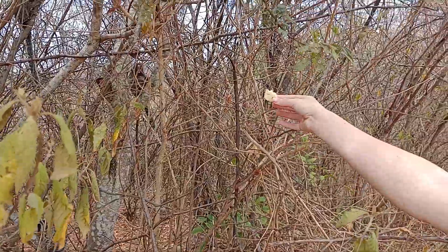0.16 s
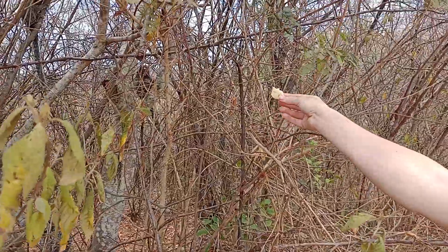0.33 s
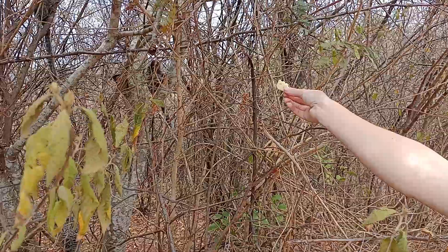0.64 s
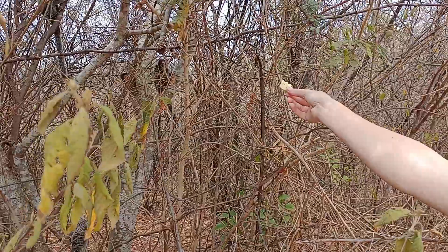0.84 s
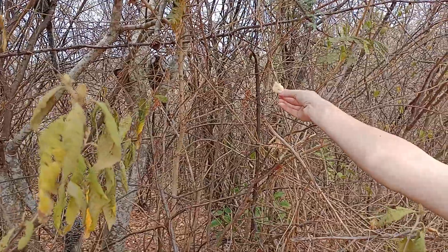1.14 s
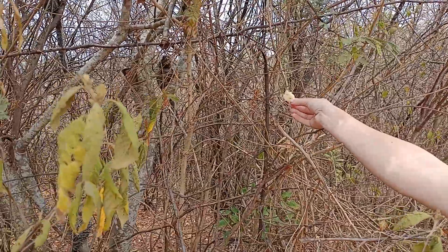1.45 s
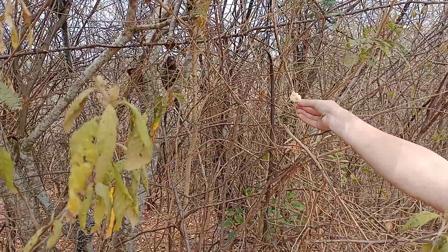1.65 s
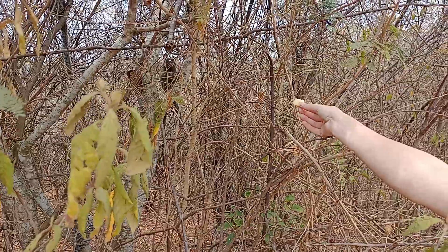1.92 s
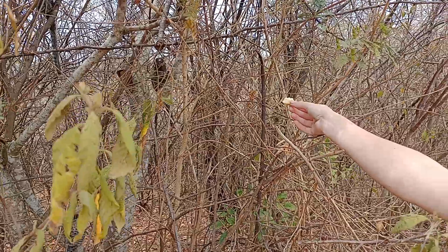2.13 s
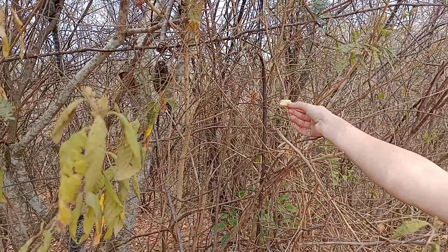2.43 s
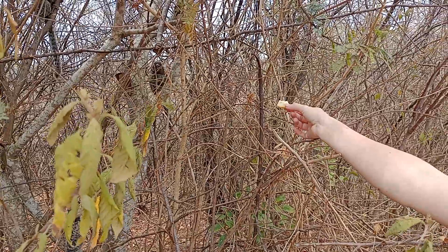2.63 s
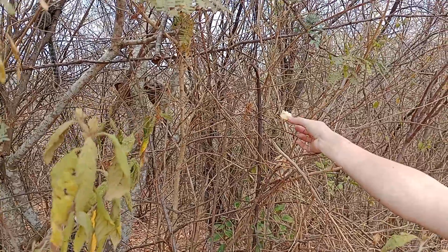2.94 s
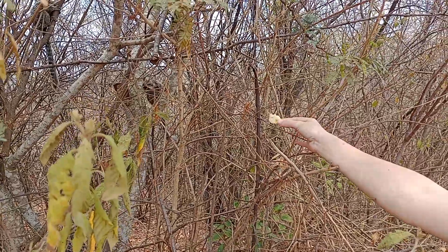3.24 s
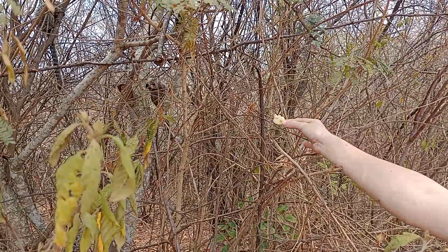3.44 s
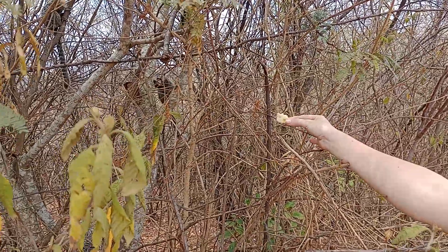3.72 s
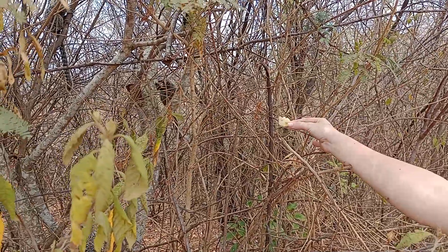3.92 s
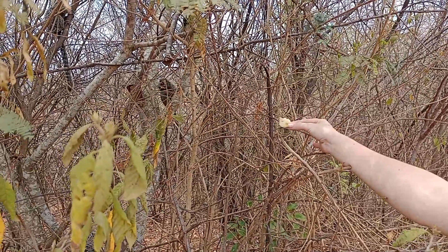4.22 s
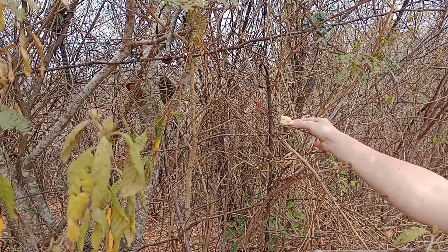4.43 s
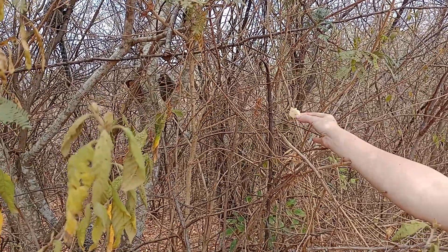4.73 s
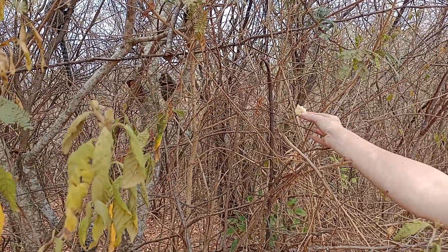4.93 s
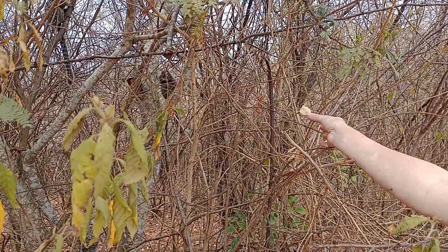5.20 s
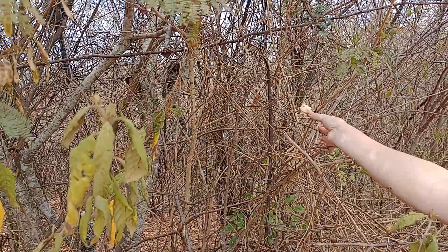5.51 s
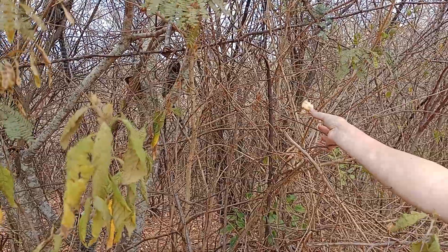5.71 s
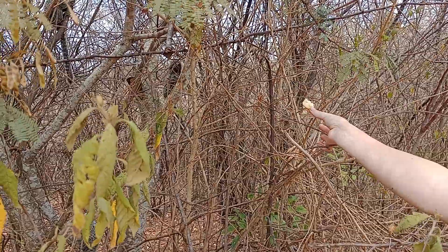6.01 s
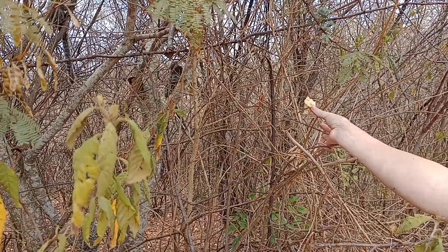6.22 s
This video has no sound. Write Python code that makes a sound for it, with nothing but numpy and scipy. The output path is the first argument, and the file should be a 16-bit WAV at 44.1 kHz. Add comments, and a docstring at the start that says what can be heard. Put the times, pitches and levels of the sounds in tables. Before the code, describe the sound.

A quiet thicket heard by a handheld microphone, with steady soft air hiss. Brittle twig crackles and high, very brief downward chirps are scattered through the first half, with a faint rustle of dry leaves around two seconds. After a sparse lull, hard, crisp clicks close to the microphone repeat every few tenths of a second until the end, mixed with tiny squeaks, chirps and a soft low gust.

```python
"""Two short squeaks and a twig snap open the scene, then falling chirps: small monkeys scold in a dry thicket.
The calls are gliding tones, stacks of partials and a thin whistle; sharp dry clicks close by are impulses
through resonant bands, and twigs and leaves a few steps off are decaying bursts of band-passed noise.
Sparse echoes join them over shaped noise for the hiss of open air, a far rustle of leaves and a low wind
that gusts near the end, with faint chance ticks and steady insect tones that soon fade away."""
import sys
import numpy as np
from scipy import signal
from scipy.io import wavfile
from scipy.ndimage import uniform_filter1d

SR = 44100
rng = np.random.default_rng(int(sys.argv[2]) if len(sys.argv) > 2 else 0)


def wav_record(signal):
    """Record a signal, one row per channel, as 16-bit PCM in the file named by sys.argv[1]."""
    frames = np.transpose(np.atleast_2d(signal))
    bounded = np.clip(frames, -1, 1)
    # unit amplitude maps onto the largest positive 16-bit level
    quanta = np.round(bounded * 32767).astype(np.int16)
    wavfile.write(sys.argv[1], SR, quanta)


N = 280476  # length [samples]


def gain_of(db):
    """Decibel law: 20 dB is a tenfold amplitude."""
    return 10 ** (np.asarray(db) / 20)


def evened(x):
    """Normalization to unit root mean square."""
    return x / np.sqrt(np.mean(x ** 2) + 1e-20)


def read(points, hz):
    """Interpolation of a (frequency, value) curve along logarithmic frequency."""
    f, value = np.transpose(points)
    return np.interp(np.log(hz + 1), np.log(f + 1), value)


def level_curve(points):
    """Amplitude envelope interpolated in decibels through (time [s], level [dB]) points."""
    return gain_of(np.interp(np.arange(N) / SR, *np.transpose(points)))


def band(x, lo_hz, hi_hz):
    """Causal Butterworth band-pass, which rings after its input as a resonator does."""
    edges = np.clip([lo_hz, hi_hz], 20, .48 * SR)
    return signal.sosfilt(signal.butter(2, edges, "bandpass", fs=SR, output="sos"), x)


def tone(hz):
    """Sinusoid of unit RMS whose phase is the running sum of its frequency."""
    return np.sqrt(2) * np.sin(2 * np.pi * np.cumsum(hz) / SR)


def noise(spectrum, size, patchy_db, count=12):
    """Random short-time spectra under a fixed envelope, with drifting patches about count bins wide."""
    hz = np.fft.rfftfreq(size, 1 / SR)
    real, imaginary, patches = rng.standard_normal((4 * N // size + 5, len(hz), 3)).T
    patches = uniform_filter1d(patches, size=count, axis=0)  # across frequency
    patches = evened(uniform_filter1d(patches, size=14, axis=1))  # across time
    level_db = read(spectrum, hz)[:, None] + patchy_db * patches
    z = (real + 1j * imaginary) * gain_of(level_db)
    return evened(signal.istft(z, nperseg=size, noverlap=3 * size // 4)[1][:N])


def add(mix, s, sound):
    """Superposition of one sound on the mix from time s [s]."""
    part = mix[round(s * SR):][:len(sound)]
    part += sound[:len(part)]


def played(rows, source):
    """Superposition of one sound for each row, placed at the time in its first column."""
    mix = np.zeros(N)
    for s, *how in rows:
        add(mix, s, source(*how))
    return mix


def chirp(length, top_hz, end_hz, top_db, fade_db, octave_db):
    """Source and filter: a shaky tone and its octave dive along a parabola through the throat's response."""
    # throat response: (frequency [Hz], gain [dB])
    throat_curve = [(2000, -4.5), (4000, -13.5), (5500, -8.5), (8000, -11.5), (9200, -13), (11500, -8.5),
                    (12500, -0.5), (14000, 8.5), (16000, -31)]
    notch_hz, notch_depth_db = 10300, -14  # a narrow notch, where the gliding chirp dips in level
    dive_bow = 1.023  # midway pitch over that of an even glide
    u = np.linspace(0, 1, round(length * SR))
    middle_hz = dive_bow * np.sqrt(top_hz * end_hz)
    hz = np.polyval(np.polyfit([0, .5, 1], [top_hz, middle_hz, end_hz], deg=2), u)
    hz = hz * (1 + .02 * evened(band(rng.standard_normal(len(u)), 300, 1500)))
    voice = 0
    for pitch, db in ((hz, 0), (2 * hz, octave_db)):
        notch_db = notch_depth_db * np.exp(-((pitch - notch_hz) / 800) ** 2)
        in_range = pitch < .45 * SR  # the octave shows once it falls below this limit
        voice = voice + tone(pitch) * gain_of(db + read(throat_curve, pitch) + notch_db) * in_range
    flutter_db = 3.0 * np.tanh(evened(band(rng.standard_normal(len(u)), 200, 600)))
    attack = np.sin(np.pi / 2 * np.minimum(u * length / .003, 1)) ** 2  # rises over 3 ms
    release = np.minimum((1 - u) / .1, 1)  # the last tenth
    return voice * gain_of(top_db + fade_db * u + flutter_db) * attack * release


def squeak(length, start_hz, end_hz, db, second_db, third_db, hoarse):
    """Harmonic series of seven partials; hoarseness modulates the pitch and roughens the upper partials."""
    hz = np.linspace(start_hz, end_hz, round(length * SR))
    wobble, rasp = rng.standard_normal((len(hz), 2)).T
    hz = hz * (1 + .03 * hoarse * evened(uniform_filter1d(wobble, size=60)))
    rasp = hoarse * evened(band(rasp, 80, 380))
    upper_db = third_db - 5 - 26 * hoarse  # fourth to seventh partials, weaker when hoarse
    levels = [0, second_db, third_db] + [upper_db] * 4
    stack = sum(gain_of(level) * (1 + k * rasp) * tone((k + 1) * hz) for k, level in enumerate(levels))
    return gain_of(db) * stack * signal.windows.tukey(len(hz), .4)


def whistle(rows):
    """Frequency and amplitude modulation of one thin tone that flutters in level."""
    s, hz, db = np.transpose(rows)
    t = np.arange(s[0], s[-1], 1 / SR)
    flutter = 1 + 0.19 * evened(band(rng.standard_normal(len(t)), 100, 500))
    voice = tone(np.interp(t, s, hz)) * gain_of(np.interp(t, s, db))
    return voice * flutter * signal.windows.tukey(len(t), .08)


def monkeys():
    """Superposition of the three kinds of call."""
    # falling chirps: (time [s], length [s], top pitch [Hz], end pitch [Hz], level at the top before
    # the throat [dB], change of level to the end [dB], octave over the fundamental [dB])
    chirp_rows = [ (.2445, 0.02, 13080, 2143, -24, -19, -10), (.6465, 0.016, 9860, 2270, -30, -19.5, -18),
                  (1.0605, 0.018, 14400, 2470, -29.5, -21, -5),
                  (1.3845, 0.0091, 13740, 5880, -23, -12.5, -18),
                  (1.653, 0.017, 15700, 4038, -42, 2, -26.5),
                  (2.368, 0.011, 14440, 4500, -21.5, -20, -21.5),
                  (2.392, 0.014, 11600, 2546, -26, -31.5, -15), (2.7205, 0.014, 15300, 3960, -27, -8, -25),
                  (4.0975, .018, 14070, 2625, -32.5, -13, -16), (4.954, 0.02, 15070, 2550, -34.5, -14, -23),
                  (4.981, 0.0079, 14000, 6900, -33.5, -11, -25.5),
                  (5.4835, 0.021, 12800, 2193, -31.5, -14, -6.5)]
    # squeaks: (time [s], length [s], start pitch [Hz], end pitch [Hz], level of the first partial [dB],
    # second partial over the first [dB], third over the first [dB], hoarseness [0-1])
    squeak_rows = [ (.010, 0.03, 1027, 1030, -63.5, -18, -11, 0.2),
                   (.129, 0.016, 1067, 1024, -63, -12, -6, 0.1), (1.270, 0.025, 897, 843, -78, 3, 13, 0.64),
                   (1.377, 0.0165, 857, 858.9, -80, 0, 13.5, 0.57),
                   (3.584, 0.02094, 959, 898, -80.5, 13.5, 18, 0.4),
                   (3.678, 0.024, 913, 838, -82.5, 12, 18, 0.5),
                   (5.128, 0.027, 1015, 934.5, -62.5, -3, -9, 0),
                   (5.188, 0.0158, 1017, 974.4, -67, -4, 5.5, 0.01),
                   (5.512, 0.0342, 1620, 1640, -66.5, -14, -2, 0.32),
                   (5.772, 0.02119, 1084, 1036, -66, -2, -1, 0)]
    # one list for each whistle: (time [s], pitch [Hz], level [dB])
    whistle_rows = [
        [(2.702, 12400, -73), (2.705, 13900, -55), (2.711, 15200, -30), (2.717, 15500, -40.5),
         (2.7205, 15200, -41.5)],
        [(4.220, 8800, -62), (4.235, 9220, -79.5), (4.248, 8711, -64), (4.262, 8798, -78)],
    ]
    whistles = played([(rows[0][0], rows) for rows in whistle_rows], whistle)
    return played(chirp_rows, chirp) + played(squeak_rows, squeak) + whistles


def click(spike_db, knock_db, thud_db, ring_hz, crackle_db, knock_hz):
    """Impulse response of one sharp break: bright ringing spike, hollow knock with an upper mode, low thud."""
    t = np.arange(round(.02 * SR)) / SR
    crackle = gain_of(crackle_db - 60 * t / 0.0097) * rng.standard_normal(len(t))  # T60 of 9.7 ms
    drive = (t == 0) + crackle
    spike = band(drive, 5260, 17700) + 1.7 * band(drive, ring_hz - 200, 1.05 * ring_hz + 200)
    hollow = band(drive, 0.66 * knock_hz, 2.04 * knock_hz)
    mode = 1.27 * band(drive, .97 * knock_hz, 1.03 * knock_hz)
    upper_mode = .5 * band(drive, 4650, 5150)
    knock = hollow + mode + upper_mode
    thud = band(drive, 316, 790)
    return gain_of(spike_db) * spike + gain_of(knock_db) * knock + gain_of(thud_db) * thud


def close_clicks():
    """Superposition of sharp breaks close by."""
    # breaks: (time [s], spike gain [dB], knock gain [dB], thud gain [dB], ring [Hz],
    # crackle drive at its start [dB], knock [Hz])
    click_rows = [ (.6268, -20.5, -21, -30, 13500, -30, 2322), (.6505, -18.5, -45, -43.5, 12400, -36, 2300),
                  (.6686, -22.5, -24, -40, 12500, -30, 2300), (.6957, -24.5, -28, -46, 13200, -18, 2000),
                  (.853, -37, -52, -55, 8569, -13, 2300), (.976, -37.5, -37, -55, 13580, -32, 2000),
                  (1.5587, -26, -17.5, -17, 2600, -15, 1390), (3.7467, -45, -21.5, -43, 4450, -21, 2480),
                  (4.0069, -32, -19, -17, 3600, -20, 1620), (4.5894, -21, -7, -8.5, 13790, -20.5, 1560),
                  (4.5924, -18.5, -17.5, -21, 9500, -20, 1680), (4.5979, -23, -6, -11, 13100, -12.5, 1808),
                  (4.6016, -18.5, -17.5, -16, 4670, -15, 1860),
                  (4.7646, -3.5, -19.5, -44.5, 4880, -19.5, 2230),
                  (4.7674, -7.5, -13, -18.5, 13900, -16.5, 1770),
                  (4.7718, -42.5, -17, -20, 10500, -5.5, 2280), (4.9334, -3.5, -17, -41, 6600, -18.5, 2180),
                  (4.9369, -2.5, -7.5, -14, 6841, -44, 2270), (4.9389, -26, -20, -43, 13380, -4, 2300),
                  (5.1805, -8, -4, -21, 9540, -20, 2050), (5.1826, -5.5, -14, -9.5, 6560, -22.5, 1900),
                  (5.3789, -12, -42, -32, 9300, -12.5, 2000), (5.3800, -6, -4, -10, 12890, -17.5, 1640),
                  (5.3842, -12.5, -16, -11, 13580, -12.5, 1450), (5.6095, -7, -14, -33, 9500, -20.5, 1540),
                  (5.6110, -10.5, -13, -25.5, 13100, -9.5, 1985),
                  (5.7925, -1.5, -16.5, -22, 5100, -14.5, 2040), (6.0747, -10, -16, -14, 5600, -14.5, 1630),
                  (6.0805, -4.5, -5.5, -15, 9840, -19, 1810)]
    return played(click_rows, click)


def snap(crackle_db, knock_db, thud_db, bright_hz):
    """Fracture noise: many tiny breaks excite bright crackle and rings, a woody knock and a low thud."""
    rise_s, t60_s = 0.0026, 0.05
    t = np.arange(round(.15 * SR)) / SR
    grit, sizes = rng.standard_normal((len(t), 2)).T
    grit = grit * gain_of(3.0 * evened(uniform_filter1d(sizes, size=30)))
    swell = np.minimum(t / rise_s, 1)
    around_bright = band(grit, 0.52 * bright_hz, 1.9 * bright_hz)
    crackle = evened(band(around_bright, 6130.0, 14350))
    crackle = crackle + 0.75 * evened(band(grit, 4800.0, 11130))
    # two rings at randomly drawn pitches join the ring at the bright pitch
    pitches = [bright_hz, *bright_hz * rng.uniform(.7, 1.15, size=2)]
    rings = 0.39 * sum(evened(band(grit, .97 * hz, 1.03 * hz)) for hz in pitches)
    # the wood takes one hard first blow
    blow = grit * (1 + 0.82 * np.exp(-((t - rise_s) / 0.00066) ** 2))
    knock = evened(band(blow, 1000, 3400) + .9 * band(blow, 2300, 3050))
    thud = evened(band(blow, 450, 1300))
    body = gain_of(knock_db) * knock + gain_of(thud_db) * thud
    # the burst holds briefly, then decays faster and faster
    fading = gain_of(-60 * (t / t60_s) ** 1.19)
    brief = gain_of(-60 * t / (0.95 * t60_s))  # knock and thud decay evenly in decibels
    return swell * (gain_of(crackle_db) * (crackle + rings) * fading + body * brief)


def twigs_and_leaves():
    """Superposition of fractures a few steps off."""
    # snaps: (time [s], crackle [dB], knock [dB], thud [dB], bright pitch [Hz]), levels before the decay
    snap_rows = [ (.1255, -35.5, -49, -65, 12660), (.2812, -39.5, -54.5, -57.5, 11100),
                 (.4565, -41.5, -49.5, -52.5, 8400), (1.2042, -45.5, -63, -51.5, 13330),
                 (1.3615, -48.5, -56, -56, 9900), (1.418, -52.5, -59, -65, 9800),
                 (1.557, -40.5, -46.5, -48, 9748), (1.7315, -47.5, -50, -52.5, 9166),
                 (2.0248, -61, -54.5, -68, 4549), (2.052, -49, -50.5, -54, 11050),
                 (2.3158, -44, -52.5, -57, 10570), (2.4965, -46, -52, -52.5, 9930),
                 (2.9542, -63.5, -58.5, -70, 4500), (3.9141, -50, -50.5, -53.5, 7125),
                 (4.646, -58.5, -55, -54, 9300), (4.9115, -47, -54, -59, 13710),
                 (5.0775, -42, -43.5, -54.5, 7900), (5.260, -42, -51, -53.5, 11500),
                 (5.4756, -48.5, -55.5, -53.5, 12500), (5.5582, -66, -56, -64, 4740),
                 (5.8185, -54.5, -63, -62, 8692), (5.9953, -43, -51.5, -51.5, 9966),
                 (6.184, -44, -50, -54.5, 8105)]
    return played(snap_rows, snap)


def thicket(x):
    """Multiple scattering: sparse echoes of random sign, each band with its own decay time."""
    # early echoes off stems: (frequency [Hz], T60 [s])
    stem_t60 = [(1000, 0.027), (4000, 0.049), (8000, 0.063), (13000, 0.054), (16000, 0.064)]
    taps = np.zeros(SR // 2)
    at = np.arange(60, len(taps) - 12, 12)
    taps[at + rng.integers(0, 12, len(at))] = rng.choice([-1., 1.], len(at))
    hz, t, z = signal.stft(taps, SR, nperseg=128)
    stems = gain_of(-60 * t / read(stem_t60, hz)[:, None])
    farther_trees = gain_of(-24.5 - 60 * t / 0.3)  # a faint slower tail
    tail = signal.istft(z * (stems + farther_trees), SR, nperseg=128)[1]
    return signal.oaconvolve(x, tail / np.linalg.norm(tail))[:N]


def air():
    """Stationary noise with a broad spectrum: the hiss of open air."""
    # spectrum: (frequency [Hz], relative density [dB per Hz])
    air_spectrum = [(30, -38), (60, -11), (110, -1), (200, -3.5), (400, -8), (700, -10), (1200, -12.5),
                    (2200, -10), (3200, -11.5), (5700, -13.5), (10000, -14), (15600, -15), (16000, -29)]
    # level: (time [s], level [dB])
    air_level = [(0.0, -64), (6.36, -63.5)]
    return noise(air_spectrum, size=1024, patchy_db=1.77) * level_curve(air_level)


def far_rustle():
    """Patchy noise with a slowly varying envelope: far dry leaves."""
    # spectrum: (frequency [Hz], relative density [dB per Hz])
    leaf_spectrum = [(300, -45), (1200, -14), (2000, -6), (2800, -6.5), (4000, -11), (8000, -23)]
    # level: (time [s], level [dB])
    leaf_level = [(0, -102), (1.6, -80), (1.9, -69), (2.4, -70.5), (2.7, -80), (3.3, -97), (3.7, -74.5),
                  (4.2, -74), (4.55, -69.5), (6.36, -78.5)]
    return noise(leaf_spectrum, size=256, patchy_db=4.5, count=3) * level_curve(leaf_level)


def low_wind():
    """Low-frequency noise under a gust envelope."""
    # spectrum: (frequency [Hz], relative density [dB per Hz])
    wind_spectrum = [(25, -29), (50, -6), (97, 3), (140, -6.5), (220, -21), (400, -44)]
    # level: (time [s], level [dB])
    gust_level = [(0, -82), (1.35, -78.5), (1.62, -72), (1.85, -80.5), (4.9, -84.5), (5.2, -75.5),
                  (5.29, -61.5), (5.33, -52), (5.42, -55.5), (5.62, -59), (5.82, -73), (6.36, -69.5)]
    return noise(wind_spectrum, size=4096, patchy_db=0.5) * level_curve(gust_level)


def ticks():
    """Shot noise: faint decaying grains at chance instants in the dry leaves."""
    mean_rate = 18  # [ticks per s]
    least_db = -61  # weakest grain, before the band-pass
    grain_db = least_db + 3.5 * np.minimum(rng.exponential(1, N), 3)
    strikes = gain_of(grain_db) * (rng.random(N) < mean_rate / SR)
    grain = rng.standard_normal(200) * gain_of(-60 * np.arange(200) / SR / 0.013)  # T60 of 13 ms
    return band(signal.oaconvolve(strikes, grain)[:N], 3800, 10700)


def insects():
    """Pure tones of steady pitch that hold their level, then fade linearly over 0.27 s."""
    # tones: (pitch [Hz], level before the fade [dB], time of silence [s])
    insect_rows = [(4770, -79, 0.531), (5080, -84, 1.1)]
    t = np.arange(N) / SR
    return sum(gain_of(db) * tone(np.full(N, hz)) * np.clip((end - t) / 0.27, 0, 1)
               for hz, db, end in insect_rows)


def scene():
    """Direct-to-reverberant ratio as a cue of distance: calls and snaps carry more echo than close clicks."""
    calls, near, twigs = monkeys(), close_clicks(), twigs_and_leaves()
    echoes = thicket(gain_of(-2.5) * calls + gain_of(-4.5) * twigs + gain_of(-23) * near)
    background = air() + far_rustle() + low_wind() + ticks() + insects()
    return (calls + near + twigs + echoes + background)[None]


def record(dry):
    """Band limitation by a linear-phase low-pass at 16050 Hz."""
    lowpass = signal.firwin(255, 16050, window=("kaiser", 9), fs=SR)
    return signal.oaconvolve(dry, lowpass[None], "same")


dry = scene()
out = record(dry)
wav_record(out)
```